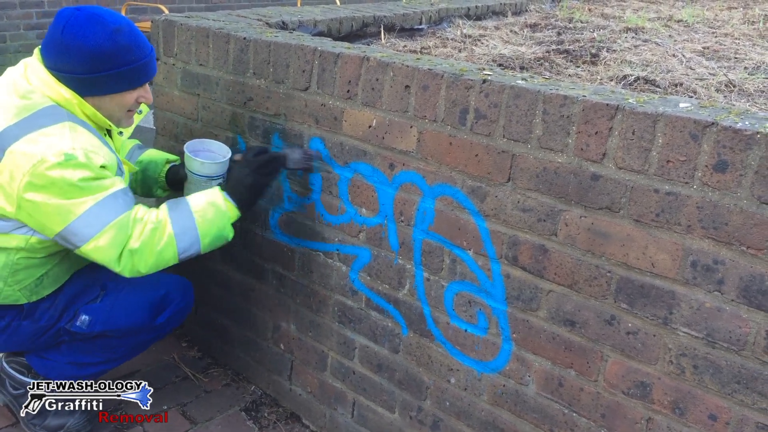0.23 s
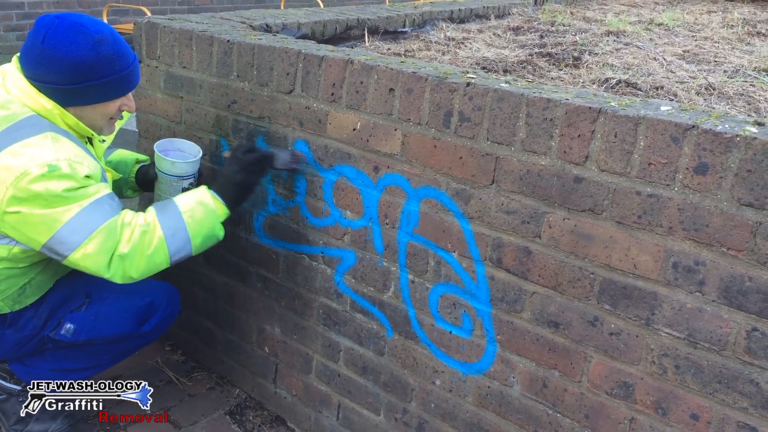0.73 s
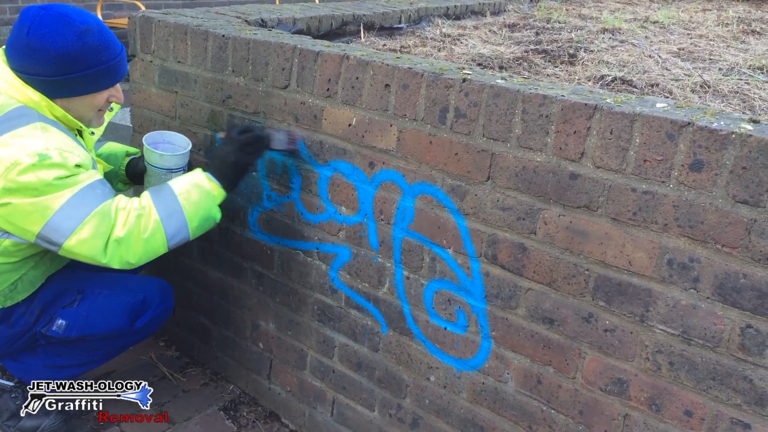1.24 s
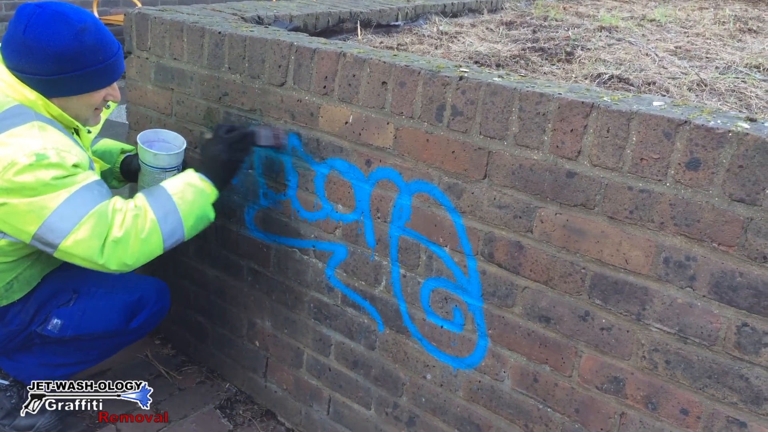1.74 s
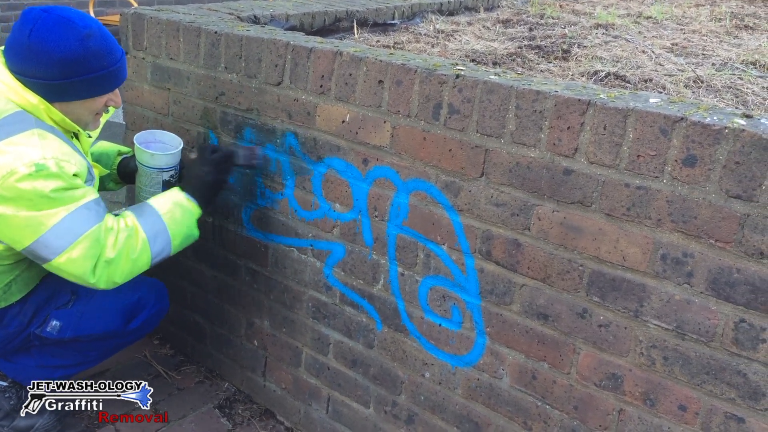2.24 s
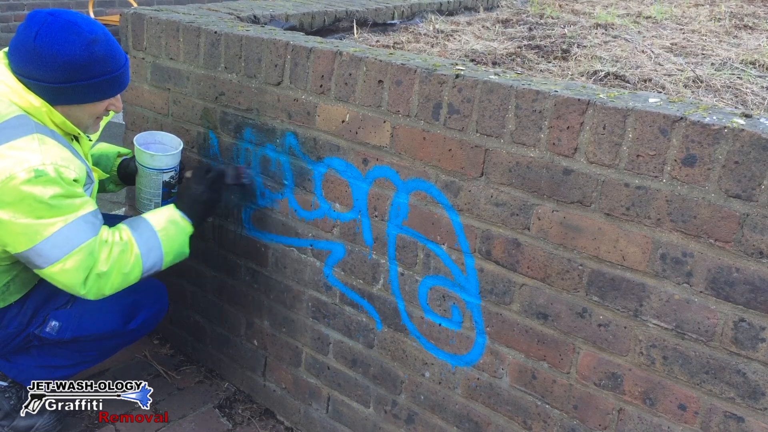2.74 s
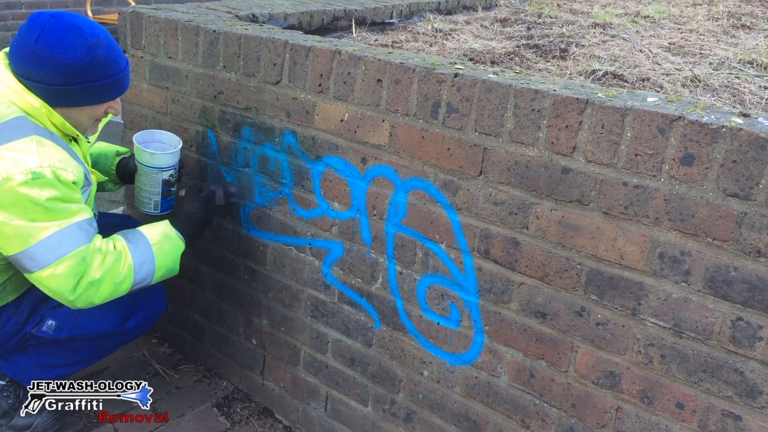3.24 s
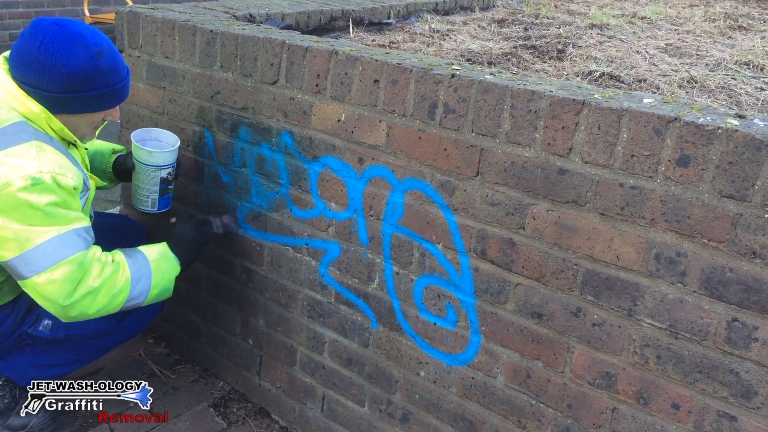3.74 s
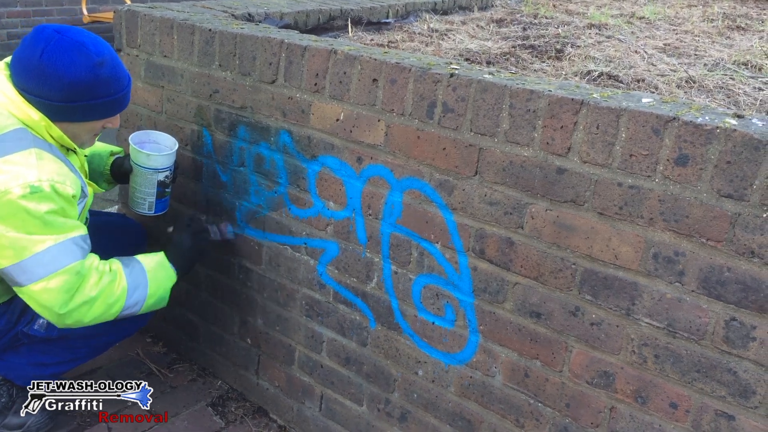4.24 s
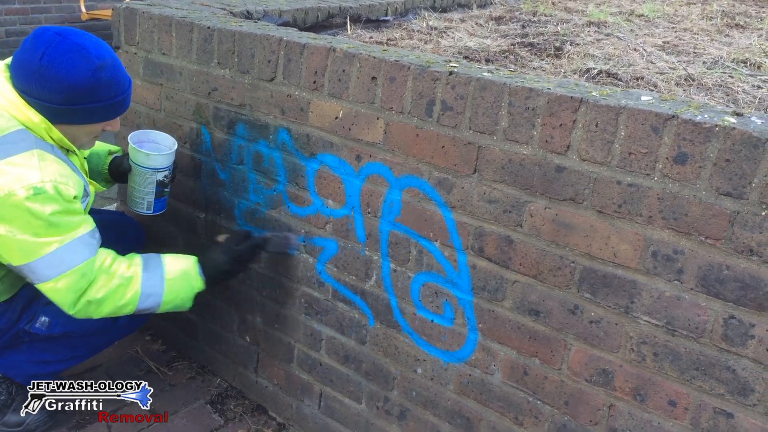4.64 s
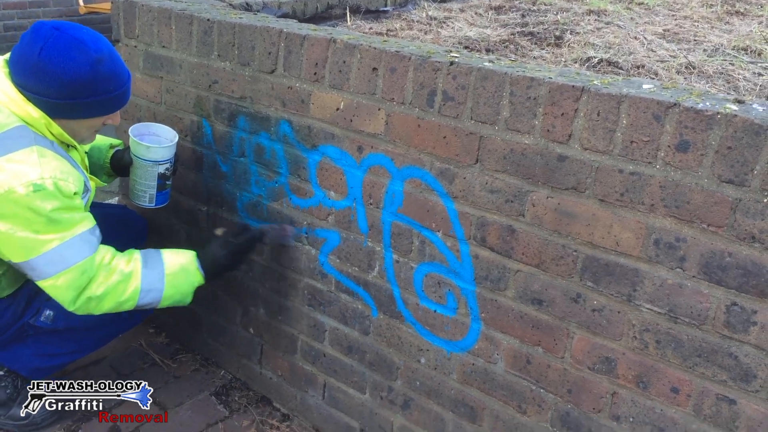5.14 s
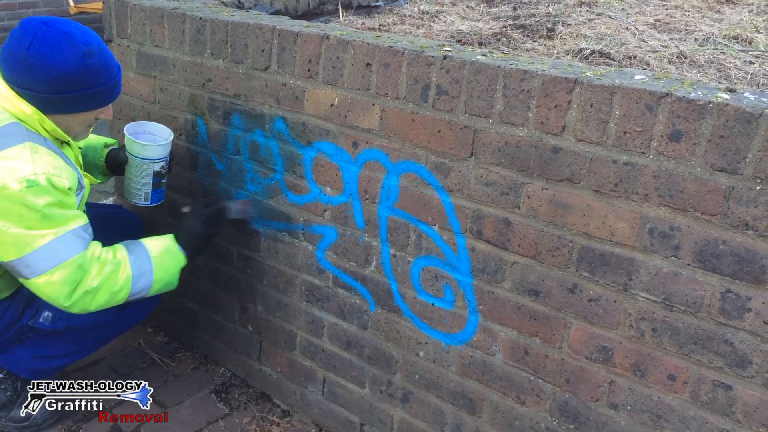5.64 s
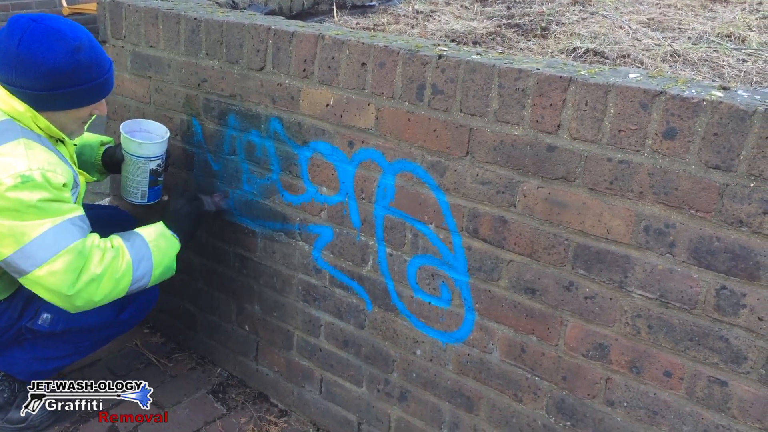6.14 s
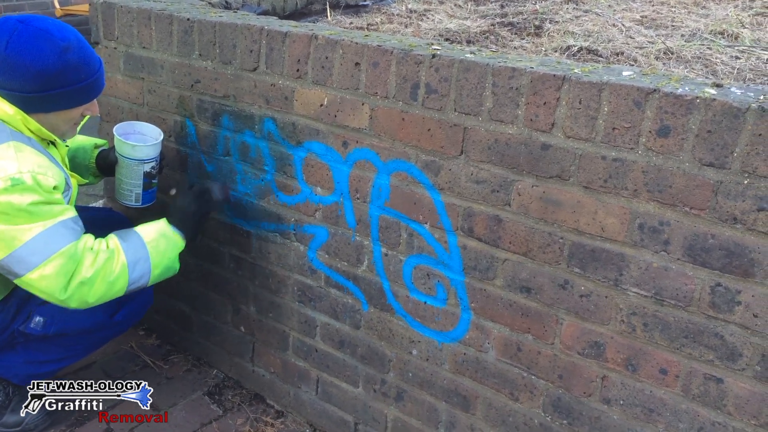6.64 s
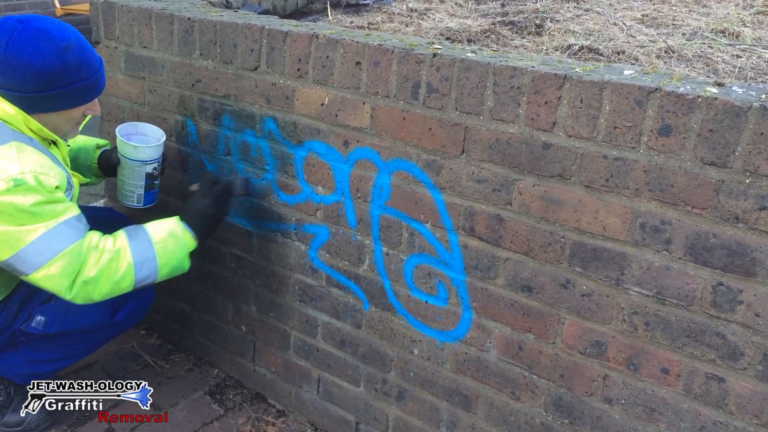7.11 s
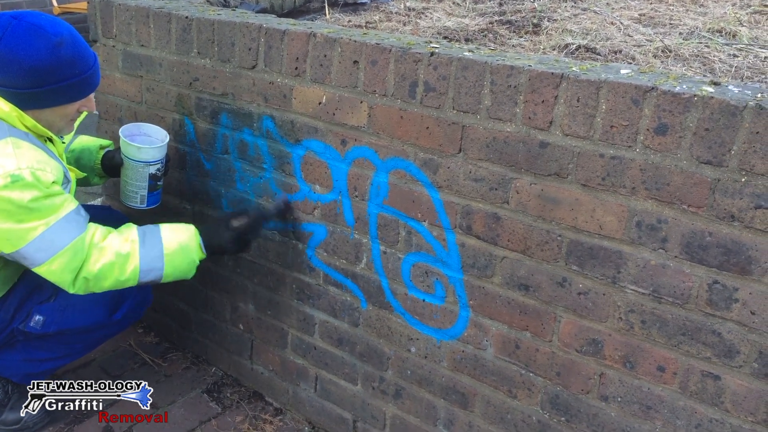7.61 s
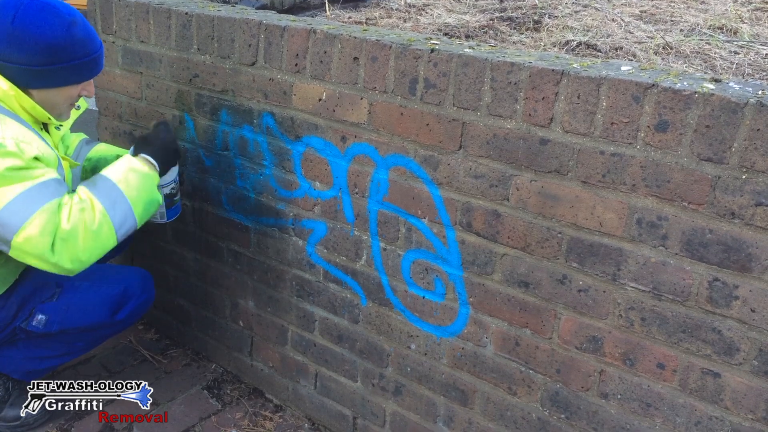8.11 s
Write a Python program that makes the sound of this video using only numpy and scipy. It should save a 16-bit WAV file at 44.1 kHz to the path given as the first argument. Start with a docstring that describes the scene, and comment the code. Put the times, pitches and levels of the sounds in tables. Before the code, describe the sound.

A stiff wet brush scrubs a brick wall outdoors, heard from a few steps away with very little echo. From the start it moves back and forth at about four or five strokes a second, each a short, bright, gritty hiss. Tufts catch on edges and joints, adding brief, lower rasps. Tiny sharp snaps stand out at about 0.7, 0.9, 2.2 and 2.9 seconds, the last the clearest. The scrubbing is a little firmer from 3 to 7 seconds, then lightens, ending with one faint, longer stroke from 8 seconds to about 8.4.

Behind it, a busy road gives a continuous wash of tyres and an uneven low rumble. Deep, throbbing engine notes come and go, swelling around 2 to 3 seconds, near 5 and 6 seconds, and most strongly between 7 and 7.8 seconds.

```python
"""Outdoors, a few steps from a brick wall, a stiff wet brush scrubs to and fro.
Friction bends and releases thousands of bristle tips, whose impulses sum to a hiss. Where tufts
catch an edge they rasp louder and lower, and a few sharp snaps stand out.
Behind lies the wash of a busy road, with the low, throbbing notes of engines that come and go."""
import sys
import numpy as np
from scipy import signal
from scipy.fft import rfft, irfft
from scipy.io import wavfile
from scipy.ndimage import uniform_filter1d

SR = 44100
rng = np.random.default_rng(int(sys.argv[2]) if len(sys.argv) > 2 else 0)


def waveform_to_disk(signal):
    """Save audio, clipped to [-1, 1], as 16-bit WAV at the path in sys.argv[1]."""
    frames = np.transpose(np.atleast_2d(signal))
    scaled = np.clip(frames, -1, 1) * 32767
    samples = np.round(scaled).astype(np.int16)
    wavfile.write(sys.argv[1], SR, samples)


N = 369116

# spectrum of the road noise: f/Hz, relative density level/dB
ROAD_SPECTRUM = [(15, -41), (25, -18), (35, -8.5), (53, -1), (80, -3.5), (165, -6.5), (280, -14.5),
                 (437, -19.5), (600, -20), (950, -17.5), (1200, -21), (1500, -20.5), (2300, -29.5),
                 (4200, -39.5), (8000, -48), (15800, -55)]
# level of the low road rumble, which rises and dips irregularly: t/s, level/dB
RUMBLE_LEVELS = [(0.0, -45), (0.12, -43), (1.07, -44.5), (1.24, -48), (2.65, -44), (3.2, -46),
                 (3.45, -41.5), (3.6, -44), (5.27, -41.5), (5.48, -45), (5.8, -39.5), (6.57, -43),
                 (7.18, -38), (7.26, -45), (7.36, -41), (7.65, -43), (8.07, -40.5), (8.37, -43)]
# envelope of the tyre wash: t/s, level/dB
WASH_LEVELS = [(0, -50), (2.5, -51), (4.5, -50), (6, -50.8), (7.2, -49.4), (8.37, -50)]
# engine notes: start t/s, end t/s, first f/Hz, last f/Hz, first level/dB, last level/dB,
# one swell's t/s, swell period/s
ENGINE_NOTES = [(0.0, 0.9, 91, 89, -51, -52, 0.1, 0.5), (1.5, 2.87, 83, 74.5, -43.5, -42, 1.77, 0.98),
                (0.2, 1.95, 136, 152, -49, -48, 1.04, 0.44), (0.0, 1.55, 59.8, 56, -45, -46, 0.06, 0.48),
                (3.3, 5.4, 60, 71, -46, -40, 3.87, 0.45), (3.68, 4.2, 105, 101, -45, -46, 3.78, 0.33),
                (5.65, 6.3, 57, 59.5, -39.5, -43, 5.85, 0.35),
                (6.72, 7.8, 65.5, 69.5, -39.5, -36, 6.87, 0.64),
                (6.8, 7.6, 135.5, 138.5, -46, -44, 7.35, 0.35)]
# sharp snaps: t/s, peak level/dB, centre f/Hz, bandwidth/Hz, 60 dB decay time/s
SNAP_BURSTS = [(.7223, -41, 5000, 6000, 0.011), (.9205, -43, 4000, 4000, .008),
               (2.156, -40, 8000, 7000, .006), (2.9335, -42, 9900, 3000, .005),
               (2.9372, -34, 10200, 2500, .009)]
# spectrum of the bristle tips' impulses: f/Hz, relative density level/dB
TIP_SPECTRUM = [(1500, 3), (2500, -3.5), (4000, -1.5), (5500, -0.5), (7000, 1.5), (10000, -1),
                (13000, -2.5), (16000, -7.5)]
# tufts dragging over an edge or joint: middle t/s, duration/s, level/dB, relative rasp level/dB, f/Hz
EDGE_CATCHES = [(0.15, 0.045, -63, 6, 3789), (0.426, 0.049, -60, -5, 4306), (0.59, 0.034, -59.3, -10, 4909),
                (0.67, 0.03, -50, -5.5, 3531), (0.921, 0.018, -63.5, 5, 3900),
                (1.101, 0.015, -56, -9, 3500), (1.148, 0.034, -53, 0, 3840),
                (1.184, 0.024, -63.5, 9.5, 2240), (1.407, 0.045, -61.5, -2.3, 4392),
                (1.54, 0.041, -56.5, -6.7, 5190), (1.63, 0.034, -52.7, -9, 5167),
                (1.858, 0.065, -65, 2, 3789), (2.105, 0.026, -51.5, -5, 3273),
                (2.35, 0.052, -61.5, -3.2, 3875), (2.49, 0.038, -55.5, -11, 4260),
                (2.584, 0.028, -47.5, -6, 3280), (2.625, 0.025, -65, 7, 2300),
                (2.83, 0.018, -59.4, 2, 2067), (3.057, 0.045, -52, -6, 3789), (3.31, 0.024, -60, -4, 3500),
                (3.488, 0.017, -58, -9, 3273), (3.55, 0.047, -55, -6, 3531),
                (3.82, 0.044, -57.5, -1.5, 2411), (4.019, 0.025, -55.5, -10, 3789),
                (4.277, 0.027, -55.5, -3, 2497), (4.578, 0.036, -53, -7, 4995),
                (4.6, 0.025, -63.5, 8.5, 2200), (4.82, 0.03, -64, 4, 3500),
                (4.857, 0.022, -61.5, 6.5, 2497), (5.1, 0.036, -62, -5.5, 5167),
                (5.13, 0.034, -66, 6, 2020), (5.29, 0.011, -57.2, -1, 3454), (5.354, 0.04, -60, 3, 2411),
                (5.49, 0.036, -58, -15, 4220), (5.555, 0.035, -51.5, -11, 3640), (5.6, 0.025, -62, 6, 2100),
                (5.77, 0.05, -63, 3, 3531), (5.976, 0.025, -53.8, 0.5, 3617), (6.197, 0.05, -59, 1, 2239),
                (6.413, 0.025, -55.7, -5.2, 4134), (6.632, 0.035, -58.7, -4.6, 4306),
                (6.848, 0.05, -55.5, -10, 3460), (7.035, 0.05, -58, 1, 2153), (7.228, 0.036, -61, -6, 3875),
                (7.346, 0.043, -59.7, -10, 5167), (7.708, 0.044, -61, -5, 3962),
                (7.885, 0.05, -68, -0.5, 2497)]
# strokes, push and draw in turn: start t/s, duration/s, level/dB at speed, level/dB before stopping
BRUSH_STROKES = [(-0.016, 0.2, -53, -66), (0.19, 0.27, -60.5, -59.7), (0.5, 0.21, -57, -56.5),
                 (0.716, 0.21, -58.5, -58.5), (0.95, 0.237, -57.5, -58.5), (1.178, 0.248, -55.5, -61),
                 (1.459, 0.179, -59, -51.3), (1.65, 0.271, -54.5, -64.5), (1.955, 0.181, -53.5, -57),
                 (2.136, 0.23, -60.5, -57.2), (2.416, 0.206, -59.5, -56.5), (2.638, 0.206, -58, -56.6),
                 (2.897, 0.197, -52.5, -59), (3.121, 0.203, -54.2, -56), (3.36, 0.204, -55, -54),
                 (3.59, 0.246, -56, -55.5), (3.878, 0.177, -55, -57.5), (4.094, 0.209, -55, -56),
                 (4.38, 0.208, -55.5, -52.5), (4.62, 0.248, -56.5, -53), (4.912, 0.208, -54, -53.5),
                 (5.15, 0.194, -57, -51.5), (5.407, 0.169, -52.5, -53), (5.585, 0.215, -55, -53),
                 (5.827, 0.184, -55, -53), (6.068, 0.171, -58, -55), (6.278, 0.176, -54.5, -53.5),
                 (6.483, 0.179, -58, -55.5), (6.715, 0.161, -54, -56.5), (6.919, 0.161, -58, -55),
                 (7.106, 0.256, -58, -56.5), (7.359, 0.227, -60.5, -74), (7.552, 0.2, -57, -63),
                 (7.738, 0.176, -63, -64), (8.0, 0.35, -66.5, -68)]


def undb(db):
    """Amplitude ratio: tenfold for every 20 dB."""
    return 10 ** (np.asarray(db) / 20)


def unit(x):
    """Normalisation to an rms of 1."""
    return x / np.sqrt(np.mean(x ** 2))


def colour(x, spectrum):
    """Spectral shaping by (f/Hz, level/dB) points, joined on a logarithmic frequency axis."""
    hz, db = np.transpose(spectrum)
    f = np.maximum(np.fft.rfftfreq(len(x), 1 / SR), 1)
    return irfft(rfft(x) * undb(np.interp(np.log(f), np.log(hz), db)), len(x))


def ring(x, hz, width):
    """Second-order resonance with unit gain at its centre."""
    return signal.lfilter(*signal.iirpeak(hz, hz / width, SR), x)


def waver(rate):
    """Random modulation of rms 1: steps held for 1 / rate seconds, smoothed twice."""
    hold = int(SR / rate)
    steps = np.repeat(rng.standard_normal(N // hold + 1), hold)
    return unit(uniform_filter1d(uniform_filter1d(steps, hold), hold)[:N])


def flicks(rate, scatter_db):
    """Shot noise: bristles let go at independent moments, some much harder than others."""
    released = rng.random(N) < rate / SR
    return unit(released * rng.standard_normal(N) * undb(scatter_db * rng.exponential(size=N)))


def road(t):
    """Broadband noise: a low road rumble rises and dips irregularly under a near-steady tyre wash."""
    noise = colour(rng.standard_normal(N), ROAD_SPECTRUM)
    rumble = signal.sosfiltfilt(signal.butter(2, 245, fs=SR, output="sos"), noise)
    wash = noise - rumble
    # cars come and go, each colouring its own band for a while
    for hz in (330, 500, 700, 950, 1400, 2000):
        band_gain = undb(.45 * waver(1.53) + .9 * waver(7))
        wash = wash + (band_gain - 1) * ring(wash, hz, .32 * hz)
    rumble_db = np.interp(t, *np.transpose(RUMBLE_LEVELS))
    wash_db = np.interp(t, *np.transpose(WASH_LEVELS))
    return unit(rumble) * undb(rumble_db) + unit(wash) * undb(wash_db)


def engines(t):
    """Amplitude and frequency modulation: each engine's low tone throbs, glides and wavers."""
    throb_depth_db, fade_s = 10, .085
    out = np.zeros(N)
    for start, end, first_hz, last_hz, first_db, last_db, swell, period in ENGINE_NOTES:
        fade = np.clip(np.minimum(t - start, end - t) / fade_s + 1, 0, 1)
        throb_db = -throb_depth_db * np.sin(np.pi * (t - swell) / period) ** 2
        hz = np.interp(t, [start, end], [first_hz, last_hz]) * (1 + .011 * waver(10))
        db = np.interp(t, [start, end], [first_db, last_db]) + throb_db + 2.16 * waver(9)
        phase = 2 * np.pi * (np.cumsum(hz) / SR + rng.random())
        out += np.sqrt(2) * fade * undb(db) * np.sin(phase)
    return out


def snaps():
    """Exponential decay: bursts of band-limited noise die within milliseconds."""
    out, t = np.zeros(N), np.arange(SR // 40) / SR
    for start, db, hz, width, t60 in SNAP_BURSTS:
        noise = rng.standard_normal(len(t)) * undb(-60 * t / t60)
        burst = ring(ring(noise, hz, width), hz, 2 * width)
        out[int(start * SR):][:len(t)] += undb(db) * burst / np.abs(burst).max()
    return out


def reverberation(power, t60_s=.18, level_db=-10.5):
    """Reflection: paving and wall return the brush's power as a short, dull tail of noise."""
    retained = undb(-60 / (t60_s * SR)) ** 2
    tail_power = signal.lfilter([1 - retained], [1, -retained], power)
    return undb(level_db) * np.sqrt(tail_power) * unit(ring(rng.standard_normal(N), 4000, 5300))


def edge_catches(t):
    """Resonance: caught tufts ring at a pitch set by their bending. Gives catch power and rasp."""
    relative_width = .25
    power, rasp = np.zeros((2, N))
    grit = flicks(5000, scatter_db=1.5)
    for middle, length, db, rasp_db, hz in EDGE_CATCHES:
        span = slice(*np.searchsorted(t, [middle - .1, middle + .1]))
        bump = undb(db) * np.exp(-2 * ((t[span] - middle) / length) ** 2)
        power[span] += bump ** 2
        tone = ring(ring(grit[span], hz, relative_width * hz), hz, 3 * relative_width * hz)
        rasp[span] += bump * undb(rasp_db) * unit(tone)
    return power, rasp


def strokes(t):
    """Friction noise grows with sliding speed and stops at the turn. Gives power and treble gain."""
    push_rise, draw_rise, light_rise = .35, .56, .72  # share of a stroke spent gaining speed
    light_db = -59.8  # a stroke ending below this is a light one
    stop_s, rest_db = .04, -22  # time to stop; relative level at either end
    push_treble_db, draw_treble_db = 2.6, 2.1
    power, treble_db = np.zeros((2, N))
    for k, (start, length, first_db, last_db) in enumerate(BRUSH_STROKES):
        share, lift_db = (draw_rise, draw_treble_db) if k % 2 else (push_rise, push_treble_db)
        rise = length * (light_rise if last_db < light_db else share)
        times = start + np.cumsum([-.05, .05, rise, length - rise, stop_s, .05])
        levels = [-120, first_db + rest_db, first_db, last_db, last_db + rest_db, -120]
        span = slice(*np.searchsorted(t, times[[0, -1]]))
        power[span] += undb(np.interp(t[span], times, levels)) ** 2
        # only the tips touch while the brush gets going, so the rise is brighter
        treble_db[span] = lift_db + np.interp(t[span], start + rise * np.array([0, .4, 1]), [0, 2.5, 0])
    return power, undb(uniform_filter1d(treble_db, SR // 50))


def bristle_hiss(treble_gain):
    """Superposition: the impulses of thousands of tips flicking off the grit merge into a hiss."""
    impulses = colour(flicks(20000, scatter_db=1.0), TIP_SPECTRUM)
    # tufts of different length bite in turn, so each band flickers alone
    hiss = unit(sum(undb(1.25 * waver(35) + .8 * waver(9)) * ring(impulses, hz, .3 * hz)
                    for hz in 1600 * 1.3 ** np.arange(10)))
    # the hiss is brighter as each stroke gets going, and slightly brighter on the push
    treble = signal.sosfilt(signal.butter(2, 9000, "high", fs=SR, output="sos"), hiss)
    return hiss + (treble_gain - 1) * treble


def brush(t):
    """Stick-slip friction: bristles catch on the brick and spring free, singly and in tufts."""
    stroke_power, treble_gain = strokes(t)
    catch_power, rasp = edge_catches(t)
    tips = np.sqrt(stroke_power) * bristle_hiss(treble_gain)
    # whole tufts springing off an edge sound duller than single tips
    tuft_spectrum = [(2000, -3), (4000, -2.5), (6500, 1), (10000, -2.5), (16000, -8.5)]  # f/Hz, level/dB
    tufts = np.sqrt(catch_power) * unit(colour(flicks(9000, scatter_db=2.0), tuft_spectrum))
    pressure = undb(.71 * waver(45))  # the face of the brick is uneven
    # now and then one bristle cracks loose above the rest
    cracks = undb(-20) * np.sqrt(stroke_power) * unit(ring(flicks(40, scatter_db=1.0), 7000, 8000))
    return pressure * (tips + tufts + rasp) + cracks + reverberation(stroke_power + catch_power)


def scene():
    """Linear superposition in one channel: brush and snaps in front, road and engines behind."""
    t = np.arange(N) / SR
    return (brush(t) + snaps() + road(t) + engines(t))[None]


def record(dry):
    """Band limiting: a steep elliptic low-pass removes the highest treble."""
    cutoff_hz = 15720
    return signal.sosfilt(signal.ellip(12, .2, 70, cutoff_hz, fs=SR, output="sos"), dry)


dry = scene()
out = record(dry)
waveform_to_disk(out)
```